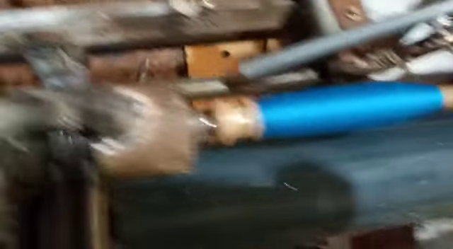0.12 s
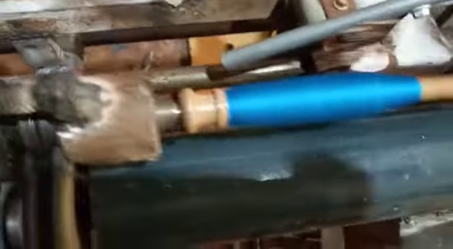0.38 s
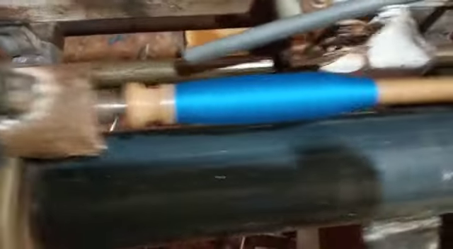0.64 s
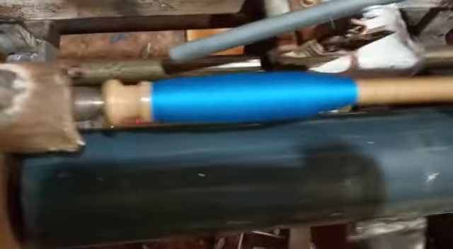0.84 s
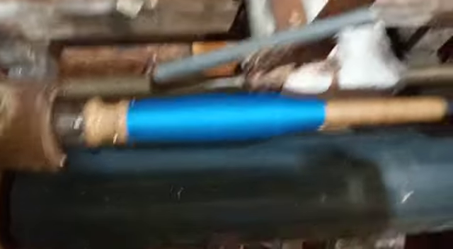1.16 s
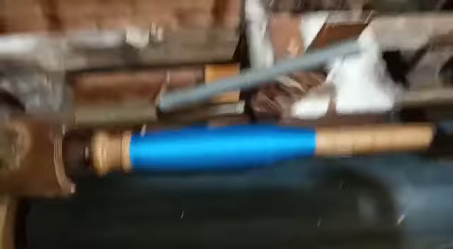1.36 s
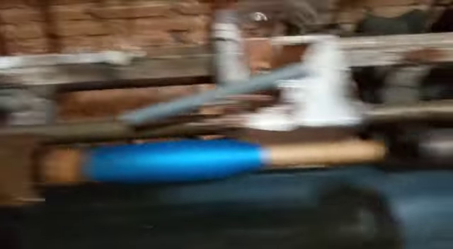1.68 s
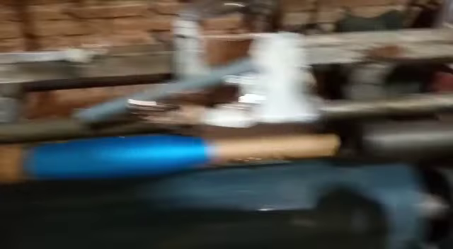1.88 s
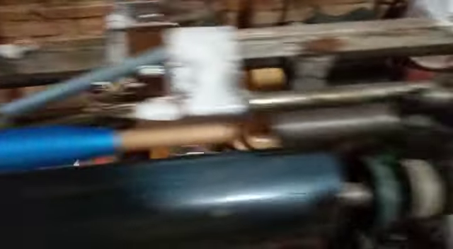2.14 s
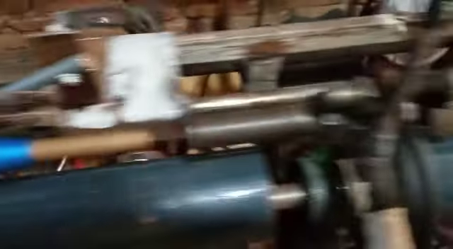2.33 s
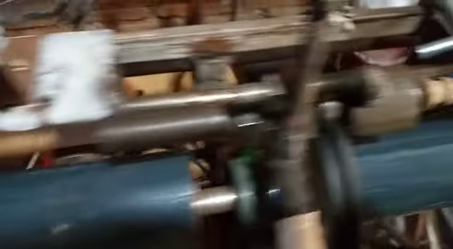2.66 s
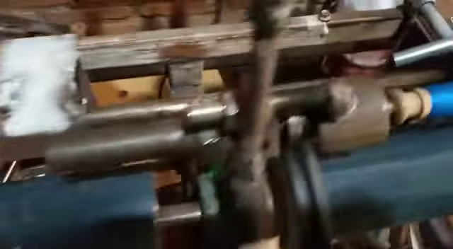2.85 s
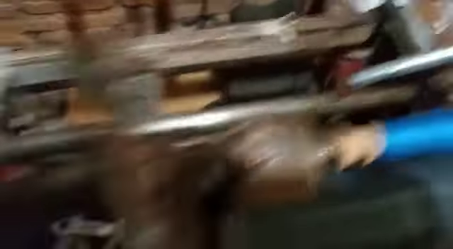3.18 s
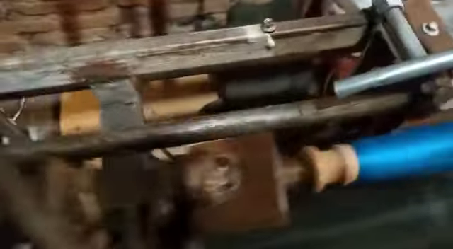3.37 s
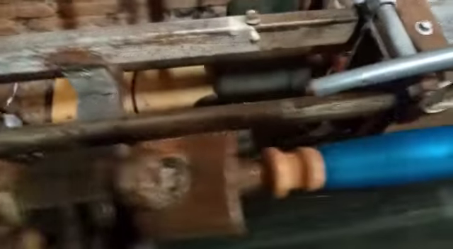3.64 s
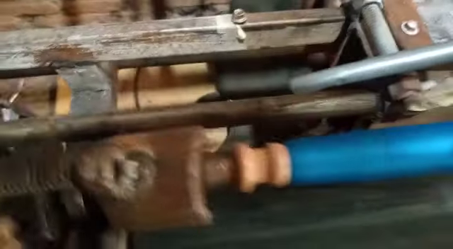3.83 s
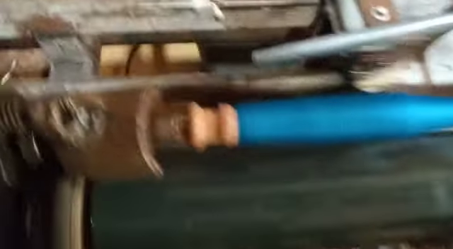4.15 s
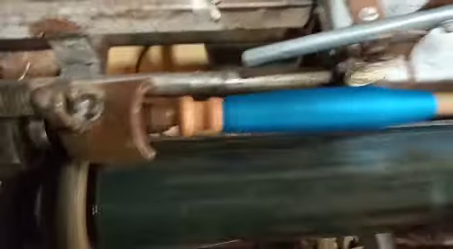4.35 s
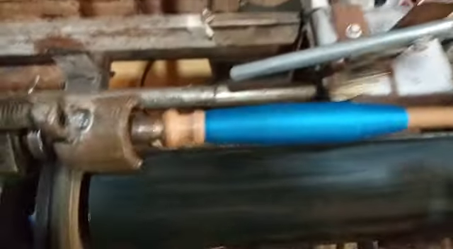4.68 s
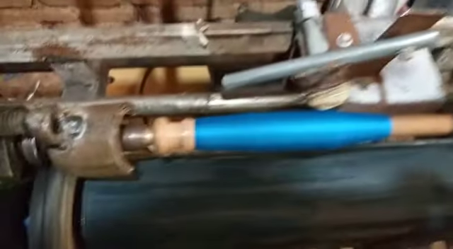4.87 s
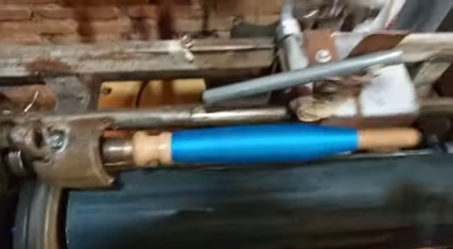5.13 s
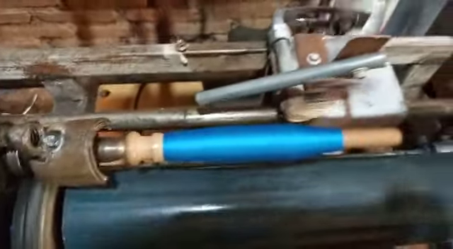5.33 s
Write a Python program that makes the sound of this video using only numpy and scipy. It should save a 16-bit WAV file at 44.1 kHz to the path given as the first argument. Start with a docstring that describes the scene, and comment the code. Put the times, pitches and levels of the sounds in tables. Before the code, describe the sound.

A motor-driven winder spins yarn onto a wooden spool in a workshop, heard close up. Rollers and gears make a steady, hissy whir with faint metallic ringing and a low rumble. The spool ticks very rapidly in its holder, swelling into brighter chatter several times, mostly near the start and again after four seconds. The yarn guide gives a short, very high squeak about every 0.7 seconds. The stereo microphone moves slowly along the machine.

```python
"""A workshop, close to a motor-driven winder spinning yarn onto a wooden spool; the stereo microphone is
carried about a metre along the machine. Rollers and gears whir and set the iron frame ringing. The spool
ticks in its holder on every turn and chatters when it works loose. The yarn guide squeaks once a stroke,
at times with a lower chirp on its way back, and the base booms at the far end.
The recorder's gain ducks under each squeak."""
import sys
import numpy as np
from scipy import signal
from scipy.fft import rfft, irfft, next_fast_len
from scipy.io import wavfile
from scipy.ndimage import uniform_filter1d

SR = 44100
rng = np.random.default_rng(int(sys.argv[2]) if len(sys.argv) > 2 else 0)


def log_audio(samples):
    """Write samples as a 16-bit WAV file to the path given in sys.argv[1]."""
    # one column per channel
    frames = np.atleast_2d(samples).T
    # limit to full scale, then quantise
    limited = np.clip(frames, -1, 1)
    pcm = np.round(limited * 32767).astype(np.int16)
    wavfile.write(sys.argv[1], SR, pcm)


N = 242770
MESH_HZ = 481   # gear teeth meeting
# Where the gears sit: place along the machine in m, distance from the microphone's path in m,
# relative level in dB with the microphone abreast.
GEARS = (0.069, 0.36, -39)


def from_db(db):
    """Decibels to gain."""
    return 10 ** (np.asarray(db) / 20)


def rms_one(x):
    """Scale to rms 1."""
    return x / np.sqrt(np.mean(x ** 2) + 1e-20)


def in_time(rows):
    """A curve of (seconds, value) rows at every sample."""
    return np.interp(np.arange(N) / SR, *np.transpose(rows))


def at_hz(points, hz, column=1):
    """Read a column of a spectrum on a log-frequency axis."""
    table = np.array(points)
    return np.interp(np.log(hz + 1), np.log(table[:, 0]), table[:, column])


def filtered(x, response):
    """Filter by a gain given as a function of frequency."""
    size = next_fast_len(N + SR // 10)
    hz = np.arange(size // 2 + 1) * SR / size
    return irfft(rfft(x, size) * response(hz), size)[..., :N]


def drift(rate_hz):
    """A smooth random wander, rms 1, mostly slower than rate_hz."""
    r = np.exp(-40 * np.pi * rate_hz / SR)
    slow = signal.lfilter([1], [1, -2 * r, r * r], rng.standard_normal(N // 20 + 4002))[4000:]
    return np.interp(np.arange(N) / 20, np.arange(len(slow)), rms_one(slow))


def resonance(x, hz, width_hz):
    """A two-pole resonance, rms 1."""
    r = np.exp(-np.pi * width_hz / SR)
    return rms_one(signal.lfilter([1, 0, -1], [1, -2 * r * np.cos(2 * np.pi * hz / SR), r * r], x))


def diffuse(spectrum):
    """Stereo noise, rms 1, alike on both sides only at low frequencies."""
    # Each row: frequency in Hz, correlation of left and right.
    likeness = [(60, 0.64), (130, 0.98), (290, 0.96), (500, 0), (720, 0.99), (950, 0.33), (1400, 0),
                (3000, 0.019), (15000, 0.23)]
    mid, side = rng.standard_normal((2, N))
    mid = filtered(mid, lambda hz: from_db(at_hz(spectrum, hz)) * np.sqrt(1 + at_hz(likeness, hz)))
    side = filtered(side, lambda hz: from_db(at_hz(spectrum, hz)) * np.sqrt(1 - at_hz(likeness, hz)))
    return rms_one(np.array([mid + side, mid - side]))


def heard_db(part):
    """A part's level falls with its distance from the moving microphone."""
    # The walk from spindle to spindle. Each row: time in seconds, place along the machine in m.
    mic_path = [(0, -.1), (.75, .03), (1.75, 0.14), (2.5, 0.6), (3.2, 0.56), (4.2, 0.75), (5.5, 0.98)]
    place_m, nearest_m, abreast_db = part
    return abreast_db - 10 * np.log10(1 + ((in_time(mic_path) - place_m) / nearest_m) ** 2)


def rollers(level_db, turns_per_s=48.7, patchy_db=1.03):
    """Rolling noise, throbbing once and twice a roller turn and rasping with the gear teeth."""
    # The whir. Each row: frequency in Hz, relative noise density in dB.
    spectrum = [(500, -19), (740, -8), (1050, -8), (1450, -3), (2000, -1.5), (2700, -3), (3700, -6.5),
                (5200, -7), (6700, -1.5), (8000, -4), (10000, -16), (16000, -30.5)]
    turn = 2 * np.pi * np.cumsum(turns_per_s + 0.42 * drift(2.8)) / SR
    mesh = 2 * np.pi * MESH_HZ * np.arange(N) / SR
    throb_db = 0.66 * np.sin(turn) + 0.5 * np.sin(2 * turn) - 0.5 * np.sin(mesh)
    noise = signal.sosfilt(signal.butter(3, 480, "high", fs=SR, output="sos"), diffuse(spectrum))
    dull = filtered(noise, lambda hz: 1 / (1 + (hz / 3000) ** 4))
    rolling = dull * from_db(patchy_db * drift(8.6))
    yarn_friction = (noise - dull) * from_db(patchy_db * drift(7.3))
    grain_db = 0.7 * drift(380)
    return (rolling + yarn_friction) * from_db(level_db + throb_db + grain_db)


def floor_rumble(swell_db, level_db=-44):
    """Floor and frame rumble, rising and falling with the whir."""
    # Each row: frequency in Hz, relative noise density in dB.
    spectrum = [(22, -32), (45, -8.5), (70, -9), (100, -4), (160, -1.5), (260, 0), (400, 2), (550, -4.5),
                (900, -18)]
    return from_db(level_db + swell_db + 1.7 * drift(8.1)) * diffuse(spectrum)


def frame(chatter_db, chatter_share=0.2):
    """The drive's rattle rings the iron parts, all in the same bursts; the lesser modes swell on their own, and
    spool chatter lifts the housing."""
    # Each part: place in m, distance from the microphone's path in m, relative level abreast in dB.
    bracket_spot = (0.77, 0.17, -36)
    housing_spot = (0.4, 0.55, -31)
    # The frame's lesser resonances. Each row: frequency in Hz, width in Hz, level in dB.
    modes = [(733, 53, -48), (857, 88, -44), (1520, 21, -50.5), (1876, 45, -41), (2353, 23, -42.5),
             (2630, 20, -52), (3124, 58, -42), (3422, 25, -44.5), (4127, 31, -43.5), (4234, 110, -41),
             (4524, 76, -52.5), (5880, 67, -42.5), (6524, 100, -36)]
    rattle = (rng.standard_normal((2, N)) + 0.4 * rng.standard_normal(N)) * from_db(2.6 * drift(87))
    housing_db = heard_db(housing_spot) - 6 + chatter_share * (chatter_db - chatter_db.mean())
    bracket = from_db(heard_db(bracket_spot) - 1) * resonance(resonance(rattle, 1198.6, 37), 1198.6, 37)
    gearbox = from_db(heard_db(GEARS) - 1) * resonance(rattle, 1490, 104)
    housing = from_db(housing_db) * resonance(resonance(rattle, 2003, 140), 2003, 140)
    lesser = sum(from_db(db + 1.4 * drift(10.4)) * resonance(rattle, hz, width) for hz, width, db in modes)
    return bracket + gearbox + housing + lesser


def whine(hz, wander_hz, flutter_db):
    """A wavering tone that reaches each microphone port by paths of its own."""
    phase = 2 * np.pi * np.cumsum(hz + wander_hz * drift(7.26)) / SR
    sides = [np.sin(phase + drift(0.93)) * from_db(flutter_db * drift(3.8)) for _ in range(2)]
    return np.sqrt(2) * np.array(sides)


def drive(hum_hz=80.5, pinion_follows=0.38):
    """The motor hums unevenly, its pinion sings, gears and bearings whine and the base drones."""
    # The motor: place in m, distance from the microphone's path in m, relative level abreast in dB.
    motor_spot = (.03, 0.19, -49)
    # The whines. Each row: frequency in Hz, relative level in dB.
    gear_tones = [(914, -12), (1492, -6), (1974, -3)]
    bearing_tones = [(1251, -47), (1542, -47), (1875, -40), (3109, -40.5), (4102, -47.5)]
    motor_db, gear_db = heard_db(motor_spot), heard_db(GEARS)
    phase = 2 * np.pi * np.cumsum(hum_hz + 3 * drift(6.7)) / SR
    hum = np.sqrt(2) * np.sin(phase) * from_db(motor_db - 3.5 + 2 * drift(5.9))
    mesh = 2 * np.pi * np.cumsum(MESH_HZ + 1.06 * drift(8.4)) / SR
    pinion_db = -44 + pinion_follows * (motor_db - motor_db.mean()) + 1.7 * drift(10)
    pinion = np.sqrt(2) * np.sin(mesh) * from_db(pinion_db)
    gears = sum(from_db(gear_db + db) * whine(hz, wander_hz=2.1, flutter_db=4) for hz, db in gear_tones)
    bearings = sum(from_db(db - 4.5) * whine(hz, wander_hz=6.77, flutter_db=5) for hz, db in bearing_tones)
    drone = from_db(-60) * resonance(rng.standard_normal(N), hz=93, width_hz=22)
    return hum + pinion + gears + bearings + drone


def spool_chatter(fade_s=0.047):
    """The dB a loose spool adds to its tick: each spell of chatter swells, holds and dies away."""
    # Each row: start in seconds, length in seconds, dB above the usual tick.
    spells = [(-.1, 0.71, 10), (0.722, 0.3, 9), (1.332, 0.27, 7), (1.843, 0.32, 3), (2.78, 0.45, 2.5),
              (4.033, 0.67, 7)]
    t = np.arange(N) / SR
    return sum(db * np.clip(np.minimum(t - start, start + length - t) / fade_s + 0.5, 0, 1)
               for start, length, db in spells)


def spindle(chatter_db, tick_db=-36.5, uneven_db=2.5, rise_s=0.002, decay_s=0.003, rub=0.049):
    """Once a turn the spool slaps in its holder: a short, bright scuff, with light rubbing between."""
    # Each row: time in seconds, spindle turns per second.
    speed = [(0, 31.68), (2.2, 31.62), (3.5, 31.42), (4.6, 31.65), (5.5, 31.45)]
    # One tick. Each row: frequency in Hz, relative noise density in dB.
    spectrum = [(500, -38), (2000, -25), (4000, -13), (6500, 15.5), (9000, 5), (12000, -3.5), (14200, -5.5),
                (14800, -1.5), (15500, -3)]
    turns = np.cumsum(in_time(speed)) / SR + 0.79
    count = turns.astype(int)
    age = (turns - count) / speed[0][1]
    envelope = rms_one((1 - np.exp(-age / rise_s)) * np.exp(-age / decay_s) + rub)
    strength_db = uneven_db * np.clip(rng.standard_normal(count[-1] + 1), -1.6, 1.6)[count]
    return diffuse(spectrum) * envelope * from_db(tick_db + chatter_db + strength_db)


def stick_slip(events, sag_hz, sag_s, jitter_hz, rough_db, settle_s, rise_s, ring_s):
    """Dry metal rasps and is pulled flat as it first bites, settles on its pitch, then rings out."""
    out, t = np.zeros((2, N)), np.arange(N) / SR
    jitter, grip = drift(250), np.clip(drift(150), -1.7, 1.2)
    for start, length, db, pan_db, hz in events:
        span = (t >= start) & (t < start + length + 0.1)
        age = t[span] - start
        attack = 1 - np.exp(-(age / rise_s) ** 2)
        ring_out = np.exp(-np.maximum(age - length, 0) / ring_s)
        unsettled = np.exp(-age / settle_s)
        pitch = hz - sag_hz * np.exp(-age / sag_s) + jitter_hz * jitter[span] * unsettled
        tone = np.sqrt(2) * np.sin(2 * np.pi * np.cumsum(pitch) / SR)
        level = attack * ring_out * from_db(db + rough_db * grip[span] * unsettled)
        out[:, span] += tone * level * from_db([[pan_db / 2], [-pan_db / 2]])
    return out


def workshop(x, t60_s):
    """The room answers with a dense tail of reflections, different on each side."""
    t = np.arange(SR // 2) / SR
    tail = rng.standard_normal((2, len(t))) * from_db(-60 * t / t60_s) * (1 - np.exp(-t / 0.006))
    tail /= np.sqrt(np.sum(tail ** 2, axis=1, keepdims=True))
    return signal.fftconvolve(x, tail, axes=1)[:, :N]


def yarn_guide(squeak_hz=10610):
    """The guide sticks and slips: a squeak each stroke, at times a chirp coming back, and their echo."""
    # Each row: start in seconds, length in seconds, relative level in dB, left over right in dB.
    strokes = [(0.56, 0.044, -6.5, 9.5), (1.247, 0.039, -7.5, 3), (1.936, 0.054, -9, 6.5),
               (2.628, 0.022, -4, 3), (3.32, 0.027, -10.5, 10), (4.007, 0.021, -7.5, 1),
               (4.681, 0.038, -12.5, -8), (5.366, 0.053, -14.5, -5.5)]
    # Each row: the same four, then pitch in Hz.
    returns = [(2.675, .028, -12, 19, 7210), (2.714, .042, -19, 19, 7270), (3.372, .08, -30, 13, 7330),
               (3.398, .014, -25, 12, 7270), (4.046, .055, -31.5, 13, 7300), (4.598, .016, -34, 13, 8300)]
    squeaks = stick_slip([(*row, squeak_hz) for row in strokes], sag_hz=103, sag_s=0.01, jitter_hz=132,
                         rough_db=5.5, settle_s=0.043, rise_s=0.0022, ring_s=0.0043)
    chirps = stick_slip(returns, sag_hz=110, sag_s=0.03, jitter_hz=95,
                        rough_db=4, settle_s=0.15, rise_s=0.011, ring_s=0.009)
    # the gritty contact spreads noise above and below each tone
    grit = rms_one(signal.sosfilt(signal.butter(1, 700, fs=SR, output="sos"), rng.standard_normal(N)))
    direct = (from_db(-5) * squeaks + chirps) * (1 + from_db(-17.5) * grit)
    return direct + from_db(-16.5) * workshop(direct, t60_s=0.22)


def base_boom():
    """The base booms, swelling as the microphone nears the far end."""
    # The base: place in m, distance from the microphone's path in m, level abreast in dB.
    base_spot = (1.07, 0.12, -40.5)
    # Each row: frequency in Hz, relative noise density in dB.
    spectrum = [(25, -22), (45, -10), (85, 2), (150, -6), (230, 0), (400, 1), (600, -10), (1200, -40)]
    return from_db(heard_db(base_spot)) * diffuse(spectrum)


def scene():
    """The whole winder, as it reaches the moving microphone."""
    # The whir's loudness, dipping briefly twice near the start.
    # Each row: time in seconds, relative level in dB.
    whir_levels = [(0.05, -20.5), (.1, -24.5), (.17, -20.7), (.36, -21), (.53, -24), (.67, -20.5),
                   (2.1, -21), (3, -20), (4.4, -20.5), (5.5, -20)]
    whir_db = in_time(whir_levels) + 0.18 * drift(5.4)
    swell_db = whir_db - whir_db.mean()   # rumble and ringing follow the whir
    chatter_db = spool_chatter()
    rumble = floor_rumble(swell_db)
    ringing = from_db(swell_db) * frame(chatter_db)
    hum = drive()
    boom = base_boom()
    return rollers(whir_db - 3) + rumble + ringing + hum + spindle(chatter_db) + yarn_guide() + boom


def gain_control(x, threshold_db=-21.5, slope=0.54, release_db_per_s=400, bass_slope=0.89, bass_s=0.016):
    """Loud treble turns the whole sound down, the bass further and more slowly; recovery is quick."""
    treble = signal.sosfilt(signal.butter(2, 6500, "high", fs=SR, output="sos"), x)
    power = uniform_filter1d(np.mean(treble ** 2, axis=0), size=260)
    level_db = 10 * np.log10(np.abs(power) + 1e-12)
    fall_db = release_db_per_s * np.arange(N) / SR
    held_db = np.maximum.accumulate(level_db + fall_db) - fall_db
    excess_db = uniform_filter1d(np.maximum(held_db - threshold_db, 0), size=200)
    r = np.exp(-1 / (bass_s * SR))
    late_db = signal.lfilter([1 - r], [1, -r], excess_db)
    bass = filtered(x, lambda hz: 1 / (1 + (hz / 400) ** 4))
    return (x - bass + bass * from_db(-bass_slope * late_db)) * from_db(-slope * excess_db)


def record(dry):
    """Each microphone port colours the sound, the left hears it later; the gain ducks, the top is cut."""
    # The two ports. Each row: frequency in Hz, left gain in dB, right gain in dB.
    ports = [(80, 4.5, 1), (765, 3.5, -1), (1320, 5.5, 0.5), (2400, 6, -2), (5190, 7, 1), (6570, 2, -9),
             (8040, 1, -18.5), (9640, 1, -3.5), (11800, -3, 7.5), (13900, -3, 4.5), (14250, 15, 6),
             (14500, 8, 14.5)]
    lag_s, cutoff_hz = 0.001069, 15850
    left = filtered(dry[0], lambda hz: from_db(at_hz(ports, hz)) * np.exp(-2j * np.pi * hz * lag_s))
    right = filtered(dry[1], lambda hz: from_db(at_hz(ports, hz, column=2)))
    low_pass = signal.ellip(12, 0.1, 80, cutoff_hz, fs=SR, output="sos")
    return signal.sosfilt(low_pass, gain_control(np.array([left, right])))


dry = scene()
out = record(dry)
log_audio(out)
```